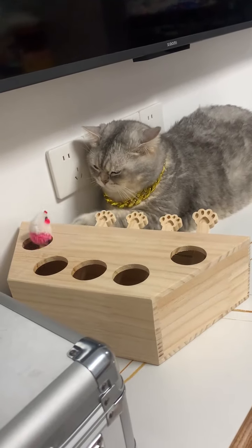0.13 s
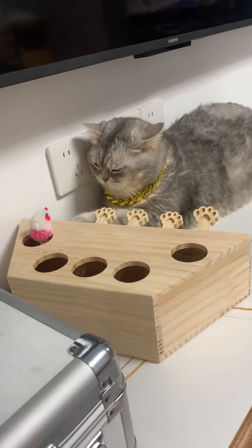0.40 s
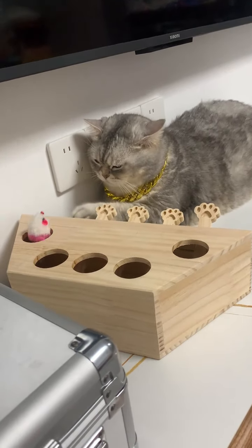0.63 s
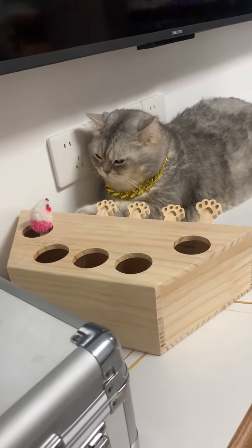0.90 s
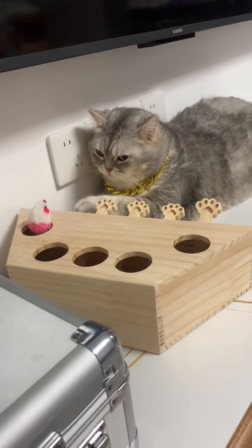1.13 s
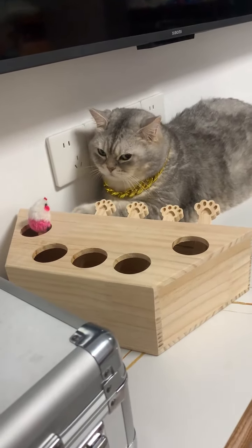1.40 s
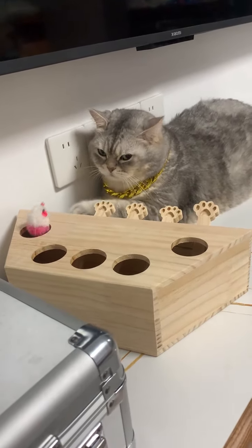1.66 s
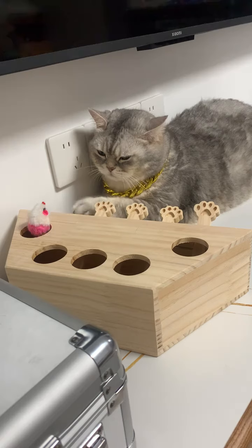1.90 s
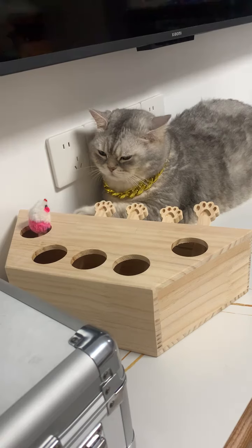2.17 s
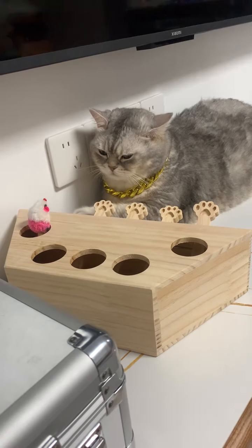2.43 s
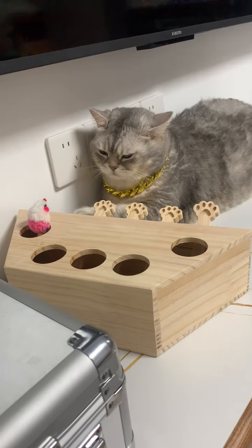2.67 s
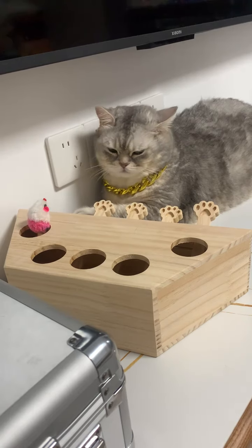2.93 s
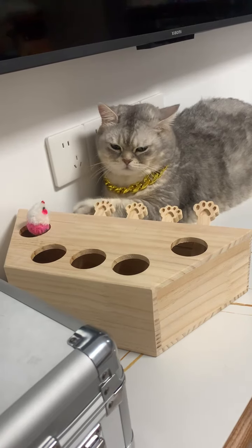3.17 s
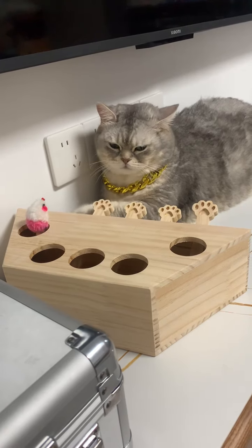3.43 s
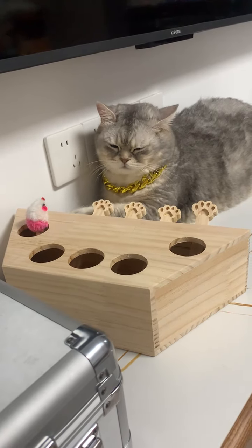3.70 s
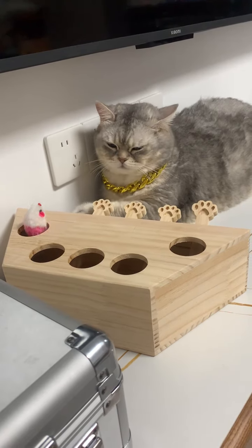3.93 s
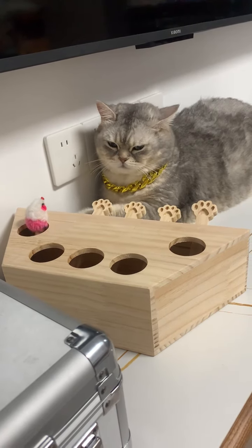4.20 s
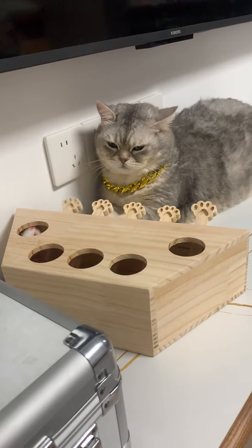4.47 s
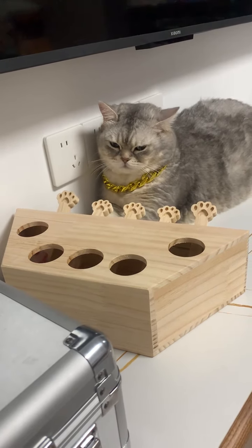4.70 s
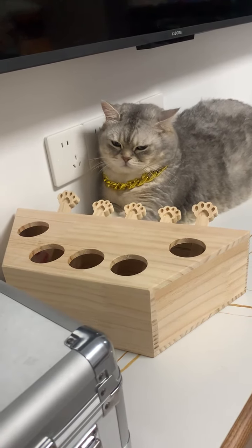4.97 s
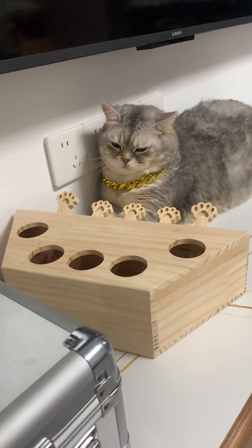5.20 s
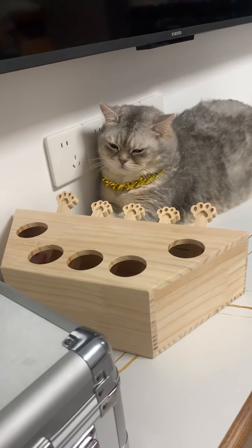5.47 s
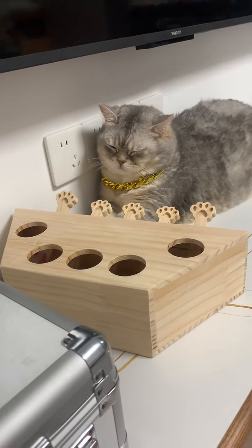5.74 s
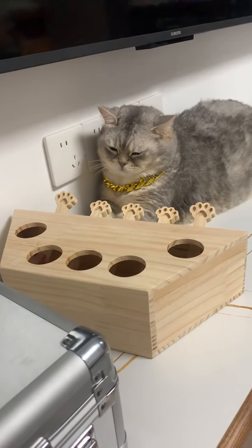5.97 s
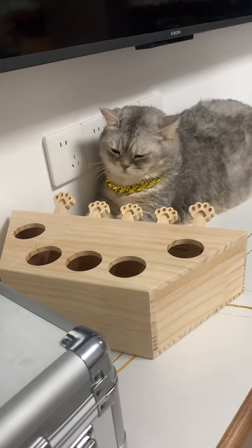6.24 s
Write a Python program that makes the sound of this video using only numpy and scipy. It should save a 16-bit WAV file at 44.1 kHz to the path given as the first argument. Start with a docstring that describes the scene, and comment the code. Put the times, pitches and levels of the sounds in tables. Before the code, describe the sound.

Sharp hollow wooden knocks in uneven spacing as a cat paws a box toy's lever, with small rebounds, in a quiet hard-walled room.

```python
"""Soft ventilation air and a low rumble, then at once a wooden knock: a cat paws the lever of a hollow box.
The lever knocks on its stop and sometimes bounces: thin panels ring first, the box body a few ms later.
A padded toy drops back inside, a paw brushes wood near the end, and a hard-walled room carries the tail.
A phone with two ports listens, the box off to one side; now and then all but its hiss dips briefly.
Knocks are decaying sines with noise cracks, the room is a noise tail, and air, brush and hiss are coloured noise."""
import sys
import numpy as np
from scipy import signal
from scipy.fft import rfft, irfft
from scipy.io import wavfile
from scipy.ndimage import uniform_filter1d

SR = 44100
rng = np.random.default_rng(int(sys.argv[2]) if len(sys.argv) > 2 else 0)


def materialize(psi):
    """Save the field psi as 16-bit PCM at rate SR to the path in sys.argv[1].

    A 1-D psi becomes a single channel; in a 2-D psi each row is a channel.
    """
    bounded = np.clip(np.atleast_2d(psi).T, -1, 1)
    quanta = np.round(bounded * 32767).astype(np.int16)
    wavfile.write(sys.argv[1], SR, quanta)


def elevation(decibels):
    """Turn decibel levels (scalar or array-like) into linear amplitude ratios."""
    levels = np.asarray(decibels, float)
    return 10 ** (levels / 20)


N = 280520  # length in samples

# Modes of the wooden box. Each row: frequency in Hz, relative level in dB, base 60 dB decay in s
# (each ring scales it), delay in ms until the wave reaches the mode.
BOX_MODES = [(93.06, -18, 0.13, 8.2), (130.5, -16, .16, 25), (142.8, -12.5, 0.15, 18),
             (232, -20, 0.04, 6.5), (277, -19, 0.075, 6), (282.6, -9.5, 0.12, 6), (394.3, -1, 0.088, 4.99),
             (524.2, 3, 0.062, 5.003), (631, -2, 0.08, 5.5), (771, 1, 0.037, 5.5),
             (819.2, -2.5, 0.17, 5.08), (1073.6, -19.5, 0.052, 1.28), (1120.3, -6.5, 0.072, 0.66),
             (1285, -11, 0.079, 0.78), (1354, -10.5, 0.033, 0.56), (1442, -12, 0.061, 0.44),
             (1720, -8, 0.044, 0.55), (1838, -18.5, 0.032, 0.46), (2015, -8, 0.045, 0.98),
             (2287, -10, 0.038, 0.23), (2777, -8.5, 0.04, 0.59), (2971, -16.5, 0.06, 0.3),
             (3390, -19.5, 0.037, 0.21), (3995, -26, 0.16, 1), (4540, -44.5, 0.12, 0.9)]
# Contact noise of wood on wood. Each row: frequency in Hz, level in dB.
CONTACT_COLOUR = [(300, -27.5), (1000, -8.5), (2500, 4.5), (4500, 4), (7000, -6.5), (9500, -18.5),
                  (12000, -18), (14500, -24.5)]


def read(table, hz):
    """Value of a (Hz, value) table on a log-frequency axis."""
    at, value = np.transpose(table)
    return np.interp(np.log(np.maximum(hz, 1)), np.log(at), value)


def colour(x, table):
    """Shape the spectrum by a (Hz, dB) table."""
    n = x.shape[-1]
    return irfft(rfft(x) * elevation(read(table, np.arange(n // 2 + 1) * SR / n)), n)


def level(x, db):
    """Scale to an rms level in dB."""
    return x * elevation(db) / np.sqrt(np.mean(x ** 2))


def walk(rate):
    """Random levels held 1 / rate s and slewed twice; spread near 1."""
    hold = int(SR / rate)
    steps = np.repeat(rng.standard_normal(N // hold + 1), hold)
    slewed = uniform_filter1d(uniform_filter1d(steps, hold), hold)
    return 1.3 * slewed[:N]


def add(track, s, x):
    """Mix x into track at time s."""
    i = int(s * SR)
    track[..., i:i + x.shape[-1]] += x


def fade(n, seconds):
    """Exponential decay over n samples with the given time constant."""
    return np.exp(-np.arange(n) / (seconds * SR))


def pair(noise, alike):
    """Left and right from three noises, the first being common to both by the power share alike."""
    alike = np.clip(alike, 0, 1)
    return np.sqrt(alike) * noise[0] + np.sqrt(1 - alike) * noise[1:]


def noise_pair(table, db, alike):
    """Coloured noise, partly or wholly the same on both ports."""
    return level(colour(pair(rng.standard_normal((3, N)), alike), table), db)


def split_ports(x, db, lead):
    """Split a level difference and a phase lead, given per FFT bin, between left and right."""
    half = (np.log(elevation(db)) + 1j * lead) / 2
    return irfft(rfft(x) * np.exp(half * np.array([[1], [-1]])), N)


def air():
    """Ventilation: steady coloured noise that breathes a little, the same on both ports."""
    # Each row: frequency in Hz, level in dB per Hz.
    air_colour = [(53, -37), (90, -7), (172, -8.5), (251, -8.5), (327, -11.5), (508, -9.5), (589, -1),
                  (633, -9), (1110, -18), (1300, -26.5), (1620, -26.5), (3000, -45), (3900, -77.5),
                  (6600, -120)]
    return noise_pair(air_colour, -62, 1.0) * elevation(1.2 * walk(1.6))


def rumble(dip_db):
    """Distant building rumble: low noise that swells and sinks around each dip."""
    level_db, swell_db, swells_per_s = -63.28, 3, 3
    # the sinking spreads more slowly than the dip; its full depth needs a dip as long as the spread
    sink_db, spread_s = -14.5, 0.53
    dipping = uniform_filter1d(1. * (dip_db < 0), int(spread_s * SR))
    swell = elevation(level_db + swell_db * walk(swells_per_s) + sink_db * dipping)
    low_noise = noise_pair([(25, -42.5), (38, -10.5), (60, -4.5), (90, -15.0), (160, -56.5)], 0, 1.0)
    return swell * low_noise


def ring(gain_db, stretch, rise_ms=0.38, last=0.78):
    """All box modes set off once; waves reach the larger, lower parts later and build them up more slowly."""
    hz, db, t60, lag_ms = (c[:, None] for c in np.transpose(BOX_MODES))
    t = np.maximum(np.arange(SR // 5) / SR - lag_ms / 1000, 0)
    build = 1 - np.exp(-t * 1000 / (rise_ms + 0.22 * lag_ms))
    decay = np.exp(-np.log(1000) * t / (t60 * last))
    swing = np.sin(2 * np.pi * hz * stretch[:, None] * t)
    sign = (-1.) ** np.arange(len(BOX_MODES))[:, None]  # neighbouring modes start in opposite directions
    return np.sum(sign * elevation(db + gain_db[:, None]) * build * decay * swing, axis=0)


def blows():
    """Lever blows: a short swell of noise, box modes and a contact crack, as heard close and by the room."""
    # Each row: start in seconds, blow level in dB, then thump, top panel and room level in dB
    # relative to the blow level.
    knock_rows = [(0.0188, -12, -6, 1, -4), (0.3817, -17.5, -3.5, -2.5, -5), (0.7103, -15, -6.5, -2, -5),
                  (1.3586, -25.5, -1, -4.5, 1), (1.705, -14.5, -6.5, -2, -4.5),
                  (2.0565, -13, -7.5, -4, -5.5), (3.4035, -28.5, -8, -5.5, -4.5),
                  (3.6402, -12, -11, -4, -5.5), (4.0614, -28, -3.5, -6.5, 3),
                  (4.5504, -28.5, 1.5, -10.5, 0.5)]
    # Noise swelling into each blow. Each row: frequency in Hz, level in dB.
    lead_colour = [(300, -20), (800, -2), (1300, 0), (2800, -6.5), (4500, -27), (7000, -51.5)]
    thump_top_hz, body_top_hz, panel_from_hz = 180, 900, 1900
    body_db, crack_db, lead_db = -10, -17, -23  # relative to the blow level
    scatter_db, detune = 1.5, 0.008  # blow to blow: spread of mode levels, spread of pitch (share)
    room_ring = 0.16  # ring length that the room hears (share of the base decay)
    lead_n, lead_s = 768, 0.004  # samples of swell, time constant
    near, far = np.zeros((2, N)), np.zeros(N)
    hz = np.transpose(BOX_MODES)[0]
    for s, blow_db, thump_db, panel_db, room_db in knock_rows:
        noise = pair(rng.standard_normal((3, 2048)), 0.8)
        crack = elevation(crack_db) * colour(noise, CONTACT_COLOUR) * fade(2048, 0.0039)
        # modes between body and panels keep the blow level
        bands = [hz < thump_top_hz, hz < body_top_hz, hz > panel_from_hz]
        share_db = np.select(bands, [thump_db, body_db, panel_db])
        gain_db = share_db + scatter_db * rng.standard_normal(len(hz))
        # the paw's weight on the lever detunes the panels a little
        stretch = 1 + detune * rng.standard_normal(len(hz))
        add(near, s, elevation(blow_db) * ring(gain_db, stretch))
        add(near, s, elevation(blow_db) * crack)
        lead = level(colour(noise, lead_colour), blow_db + lead_db)[:, :lead_n]
        add(near, s - lead_n / SR, lead * fade(lead_n, lead_s)[::-1])
        # all round the box many small modes radiate, so the room hears broader rings
        add(far, s, elevation(blow_db + room_db) * ring(gain_db, stretch, last=room_ring))
        add(far, s, elevation(blow_db + room_db) * crack[0])
    return near, far


def touches():
    """Soft touches: slow contacts set off mostly the low modes, and the surfaces scuff as they meet."""
    # The loose lever rebounds, wood on wood. Each row: start in seconds, level in dB.
    rebounds = [(1.405, -47.5), (1.43, -46), (1.45, -39.5), (3.495, -46.5), (3.515, -51), (4.105, -38.5),
                (4.126, -41.5), (4.152, -49), (4.616, -37.5), (4.633, -45)]
    # The padded toy drops back into the box. Each row: start in seconds, level in dB.
    thuds = [(4.563, -29.5), (4.606, -24.5), (4.651, -36)]
    thud_ms, rebound_ms = 6.5, 0.8  # contact time
    scatter_db, detune = 2.5, 0.013  # touch to touch: spread of mode levels, spread of pitch (share)
    near, far = np.zeros((2, N)), np.zeros(N)
    hz = np.transpose(BOX_MODES)[0]
    events = [(s, db, thud_ms) for s, db in thuds] + [(s, db, rebound_ms) for s, db in rebounds]
    for s, db, contact_ms in events:
        noise = pair(rng.standard_normal((3, 2048)), 0.8)
        # a longer contact cannot drive the high modes
        contact_db = -10 * np.log10(1 + (hz * contact_ms / 1000) ** 4)
        gain_db = contact_db + scatter_db * rng.standard_normal(len(hz))
        stretch = 1 + detune * rng.standard_normal(len(hz))
        soft = elevation(db) * ring(gain_db, stretch, rise_ms=1.8)
        scuff = elevation(db - 30.5) / contact_ms ** 2 * colour(noise, CONTACT_COLOUR) * fade(2048, 0.009)
        add(near, s, soft)
        add(near, s, scuff)
        add(far, s, elevation(1.5) * scuff[0])
        add(far, s, elevation(-14.5) * soft)
    return near, far


def off_to_one_side(near):
    """The box lies off to one side of the ports, so level and phase differ between them."""
    # Each row: frequency in Hz, left minus right in dB, radians that left leads.
    facing = [(510, 1, 0), (720, -3, 0), (830, 1, -.7), (1010, 1, .2), (1120, -1, .3), (1320, 1, 0),
              (1490, 0, -.4), (1780, -1, .2), (2260, 2, .9), (2850, 0, .6), (3400, -2, .1), (4500, 0, 0)]
    at, db, lead = np.transpose(facing)
    hz = np.arange(N // 2 + 1) * SR / N
    return split_ports(near, np.interp(hz, at, db), np.interp(hz, at, lead))


def room(x, first_ms=4, fill_ms=25, quick_from_hz=2000):
    """Dense reflections fill in after the first wall, sooner in the treble, and die by the half octave."""
    # Each row: frequency in Hz, 60 dB decay in s ahead of the closing fade.
    room_decay = [(60, 1), (420, 0.66), (1100, 0.58), (2000, .5), (3500, 0.38), (7700, 0.2), (15000, 0.12)]
    # Each row: frequency in Hz, level in dB.
    room_colour = [(60, -5), (150, -4), (450, 1.5), (800, -4.5), (1400, 2.5), (2200, -3.5), (3600, -5),
                   (5200, -8.5), (8000, -9), (14000, -5.5)]
    # Each row: frequency in Hz, share of power common to both ports (0 to 1).
    room_alike = [(400, 1), (800, 0.47), (2000, 0.89), (4000, 0.9), (5000, 0.94), (6000, 0.25), (9000, 1),
                  (14000, 0.71)]
    t = np.arange(SR) / SR
    hz = np.arange(SR // 2 + 1)
    noise = pair(rfft(rng.standard_normal((3, SR))), read(room_alike, hz))
    tail = 0
    for centre in 45 * 2 ** np.arange(0, 9, .5):
        band = np.clip(1 - 2 * abs(np.log2(np.maximum(hz, 1) / centre)), 0, 1)
        band_fill_ms = fill_ms * min(1, quick_from_hz / centre)
        fill = np.clip((t * 1000 - first_ms) / band_fill_ms, 0, 1)
        decay = np.exp(-np.log(1000) * t / read(room_decay, centre))
        tail = tail + irfft(noise * band, SR) * fill * decay
    # silent before the first wall, faded out by the end of the second
    tail = colour(tail, room_colour) * (t * 1000 > first_ms) * (1 - t) / 10
    return signal.fftconvolve(x[None], tail, axes=1)[:, :N]


def rustle():
    """A paw brushes wood: a short stroke of broad noise with a random grain."""
    middle_s, middle_db = 6.012, -70
    half_s, fade_db = 0.055, 8  # the stroke has faded this far at this distance from its middle
    away = abs(np.arange(N) / SR - middle_s) / half_s
    shape = elevation(middle_db - fade_db * away ** 3) * (away < 1.5)
    grain = elevation(1.8 * walk(150))
    fur = noise_pair([(600, -29.5), (1300, 2.5), (2500, -4.0), (4200, -10.5), (6000, -27.5)], 0, 0.51)
    return shape * grain * fur


def scene():
    """Box, its room tail, the paw and the air; all of them dip together now and then."""
    # Brief dips in level. Each row: start in seconds, end in seconds, change in dB.
    dips = [(1.076, 1.356, -32), (2.481, 2.78, -25), (4.317, 4.542, -16), (4.92, 5.19, -10)]
    t, dip_db = np.arange(N) / SR, np.zeros(N)
    for start, end, db in dips:
        dip_db += db * ((t > start) & (t < end))
    background = air() + rumble(dip_db)
    blows_near, blows_far = blows()
    touches_near, touches_far = touches()
    box = off_to_one_side(blows_near + touches_near)
    tail = room(blows_far + touches_far)
    dip_gain = uniform_filter1d(elevation(dip_db), int(0.017 * SR))
    return (box + tail + background + rustle()) * dip_gain


def hiss():
    """The microphone's own noise, about half of it common to both ports."""
    # Each row: frequency in Hz, level in dB per Hz.
    hiss_colour = [(25, -37.5), (40, -1.5), (60, 7), (130, -9.5), (400, -13.5), (1000, -17.5), (2200, -25),
                   (3000, -28.5), (5000, -30.5), (6300, -28), (8000, -34), (10000, -40), (12500, -31.5),
                   (14500, -36.5)]
    return noise_pair(hiss_colour, -68, 0.49)


def band_limit(x):
    """A steep low-pass at the top of the band."""
    return signal.sosfilt(signal.butter(12, 14330, fs=SR, output="sos"), x)


def record(dry):
    """Hiss joins; the two ports differ in phase and level; the bass is made nearly the same left and right."""
    # Each row: frequency in Hz, radians that left leads.
    port_lead = [(0, 0), (1380, -0.4), (1810, 0.8), (2500, -1.6), (3010, -2.3), (5000, -3.2), (5680, -2.7),
                 (6460, 0.2), (7410, 0.1), (9040, 2.9), (10200, 3.3), (11800, 6.1), (13000, 6.4),
                 (13900, 8.5)]
    # Each row: frequency in Hz, left minus right in dB.
    port_balance = [(60, 0.0), (110, 0.0), (200, 0.0), (370, 0.0), (670, -1.0), (1230, -1.0), (2240, -1.0),
                    (4110, -0.5), (7510, 0.5), (13700, 0.0)]
    mono_below_hz, least_side_db = 480, -22
    hz = np.arange(N // 2 + 1) * SR / N
    balance_db = np.interp(hz, *np.transpose(port_balance))
    lead = np.interp(hz, *np.transpose(port_lead))
    left, right = split_ports(dry + hiss(), balance_db, lead)
    low_cut = signal.butter(2, 34, "high", fs=SR, output="sos")
    mid = signal.sosfilt(low_cut, left + right) / 2
    narrow = 1 / np.sqrt(1 + (mono_below_hz / np.maximum(hz, 1)) ** 16)
    side = irfft(rfft(left - right) / 2 * np.maximum(narrow, elevation(least_side_db)), N)
    return band_limit(np.array([mid + side, mid - side]))


dry = scene()
out = record(dry)
materialize(out)
```